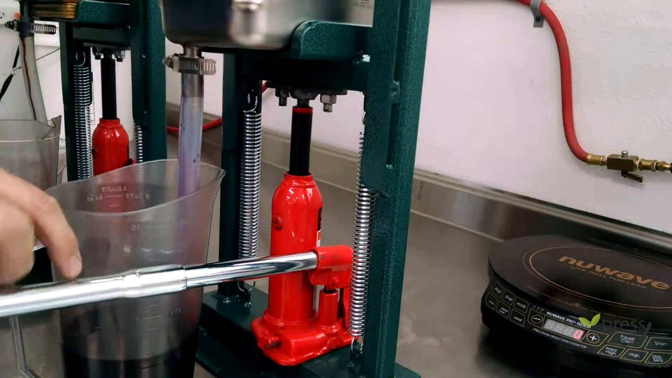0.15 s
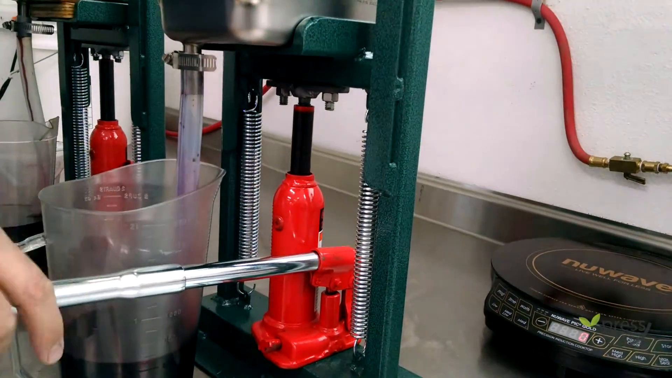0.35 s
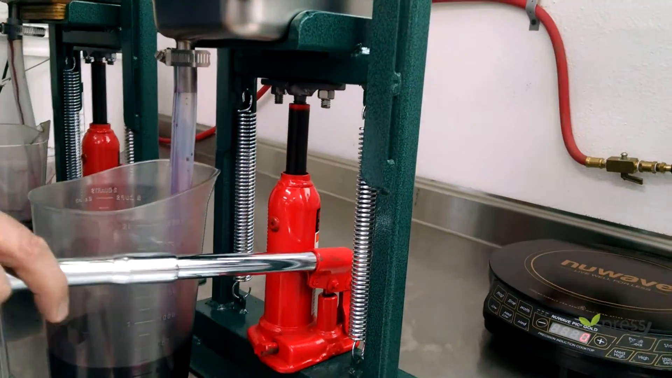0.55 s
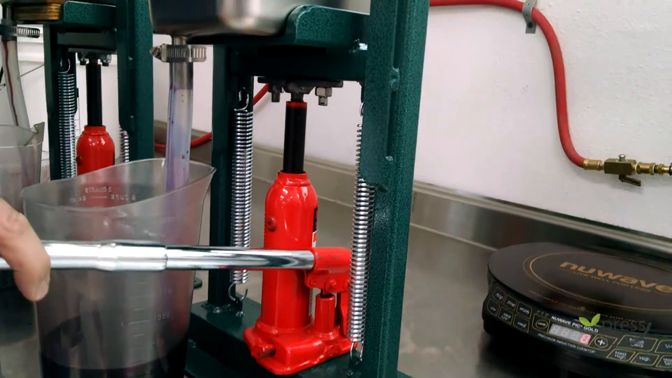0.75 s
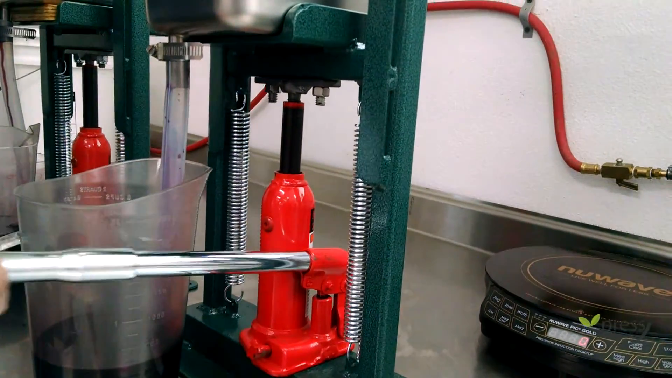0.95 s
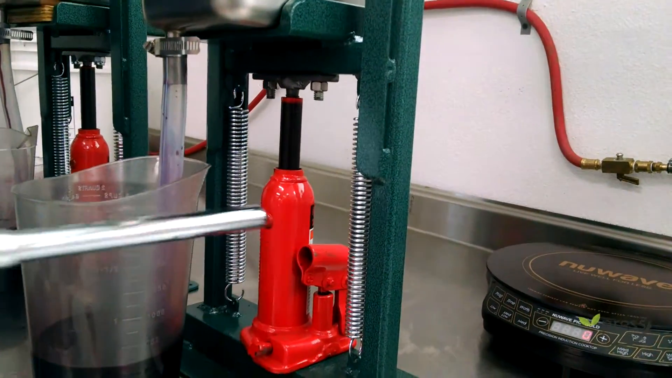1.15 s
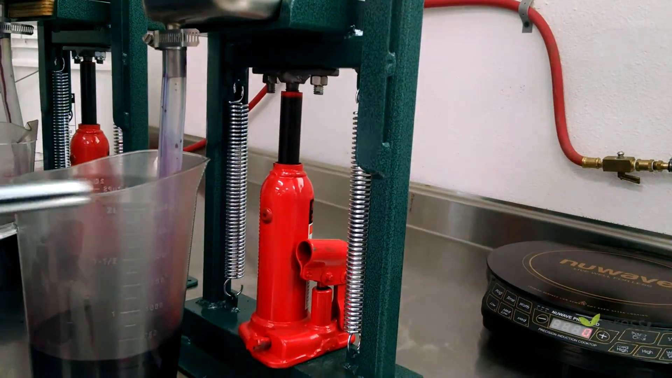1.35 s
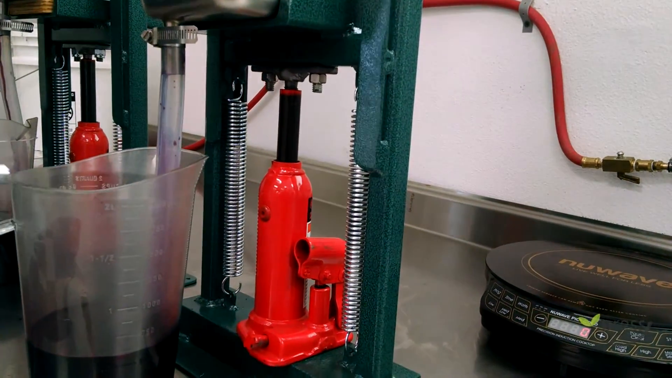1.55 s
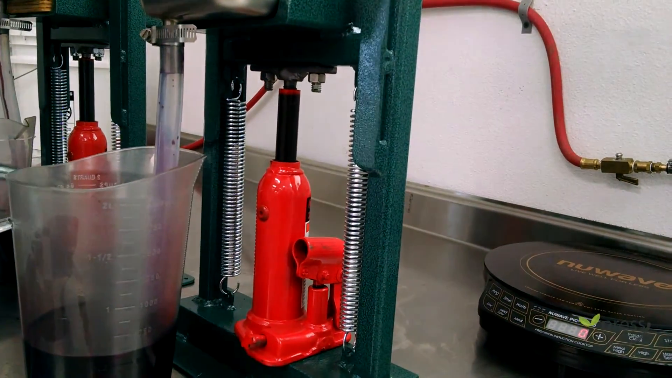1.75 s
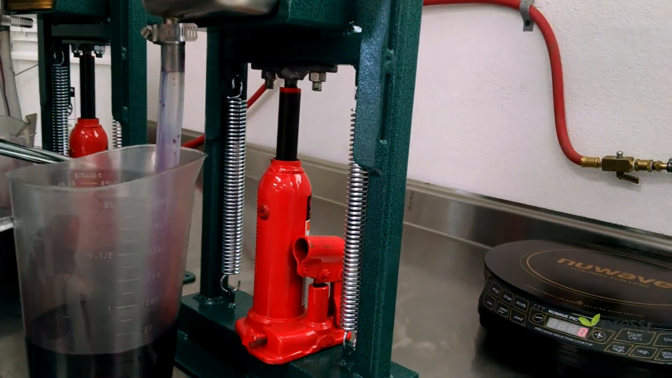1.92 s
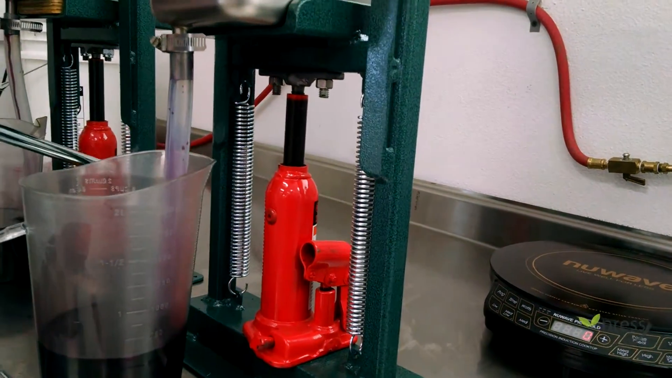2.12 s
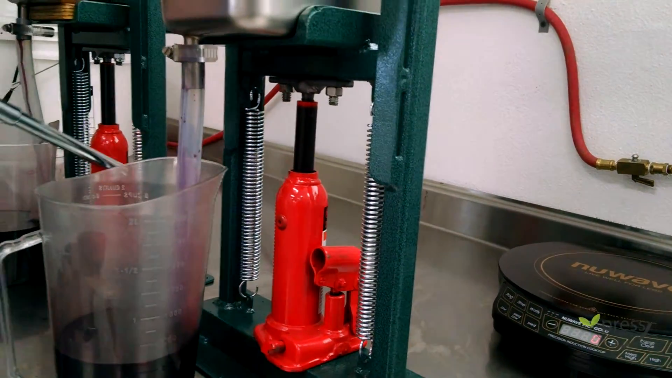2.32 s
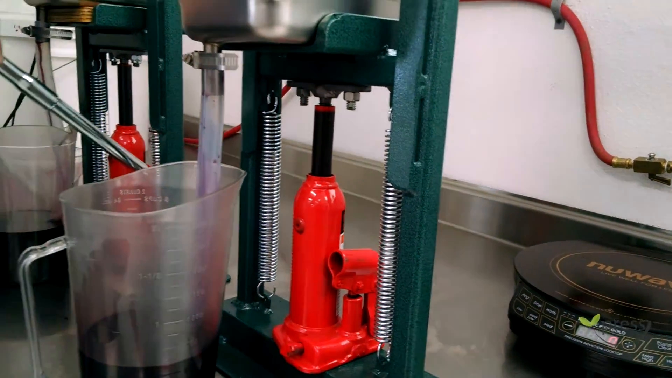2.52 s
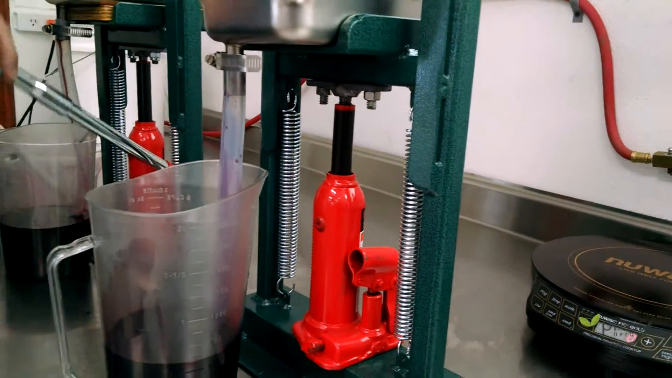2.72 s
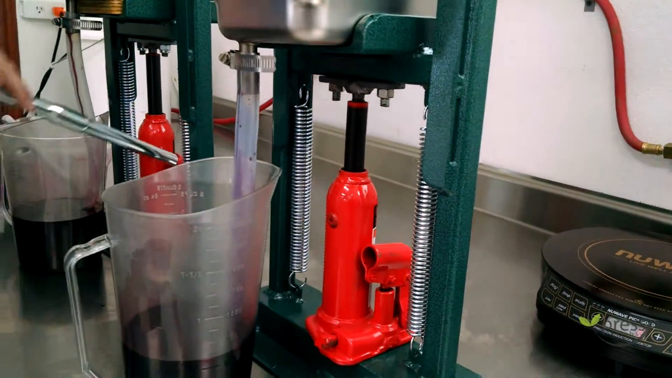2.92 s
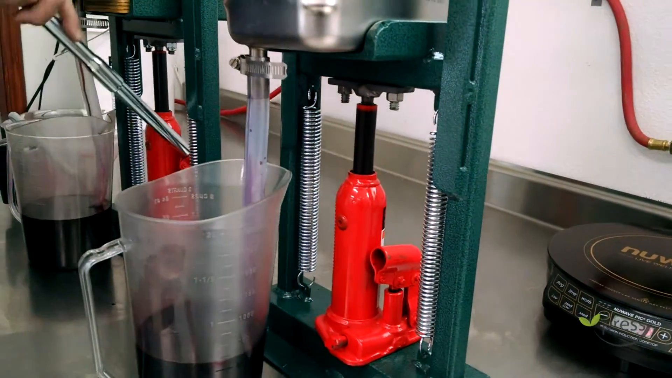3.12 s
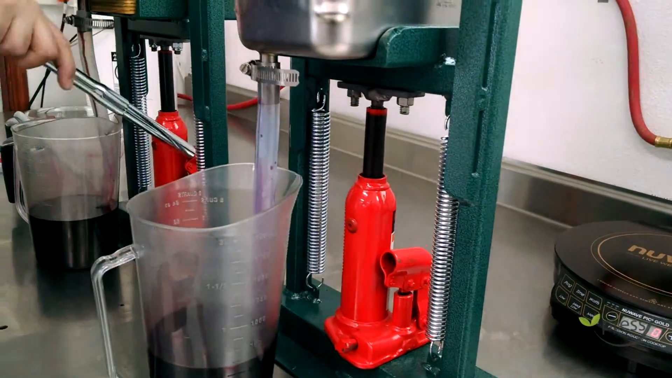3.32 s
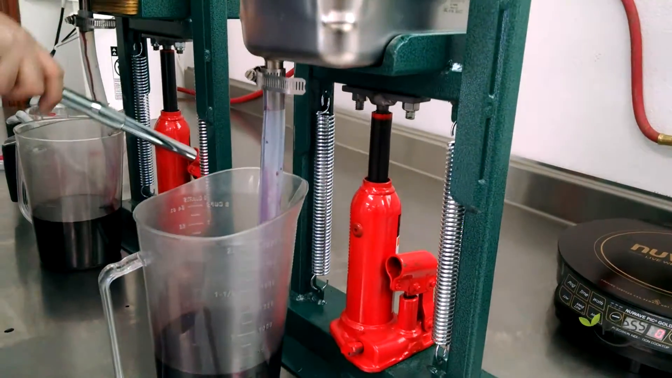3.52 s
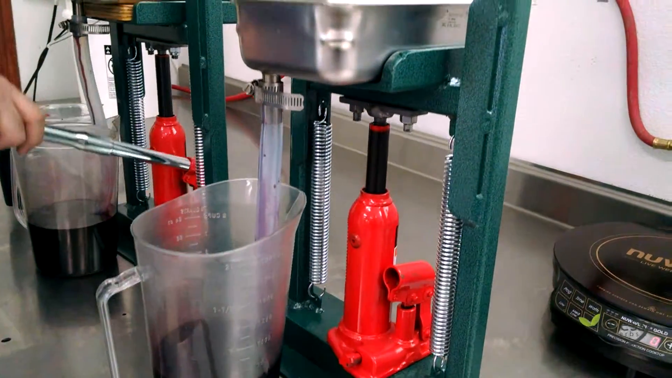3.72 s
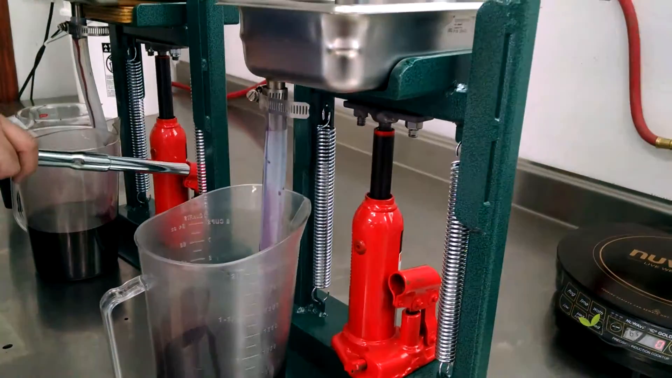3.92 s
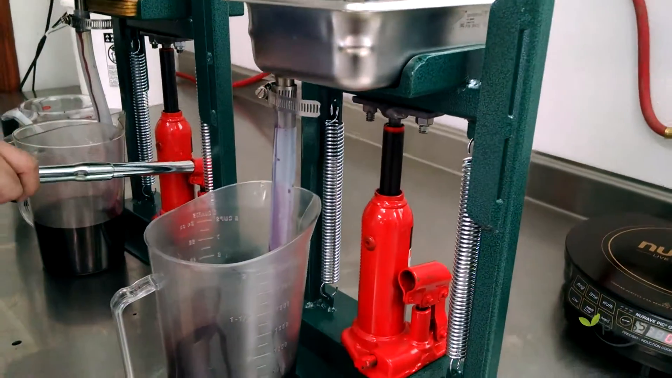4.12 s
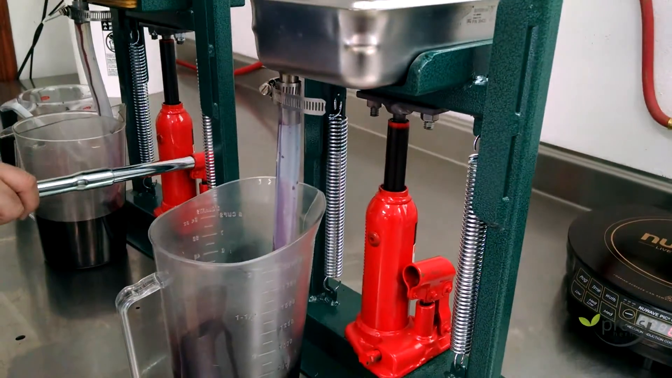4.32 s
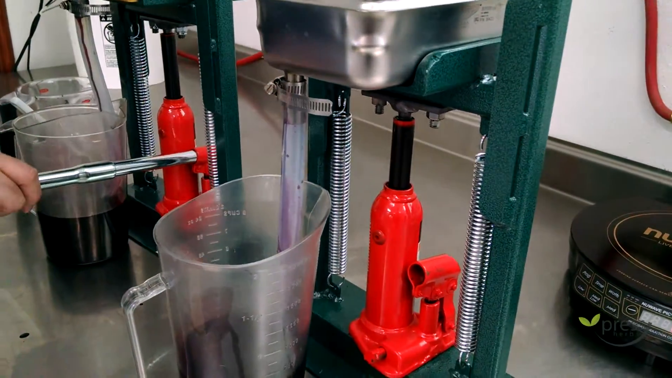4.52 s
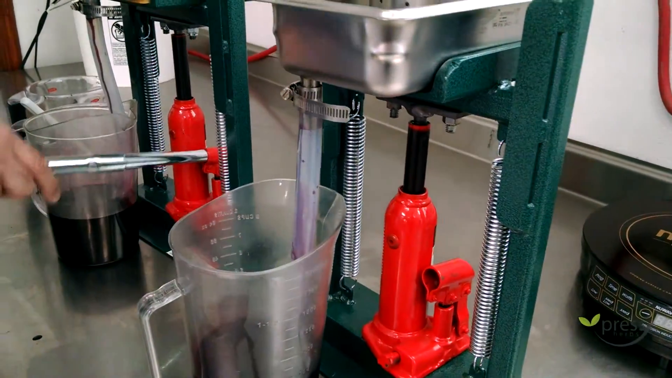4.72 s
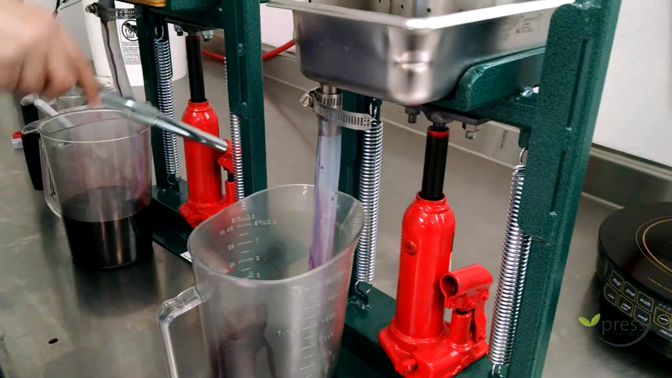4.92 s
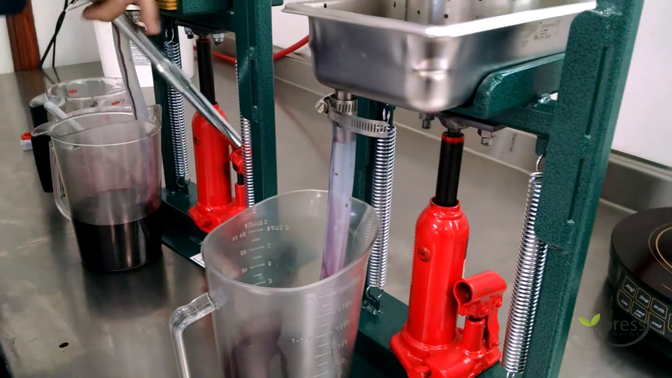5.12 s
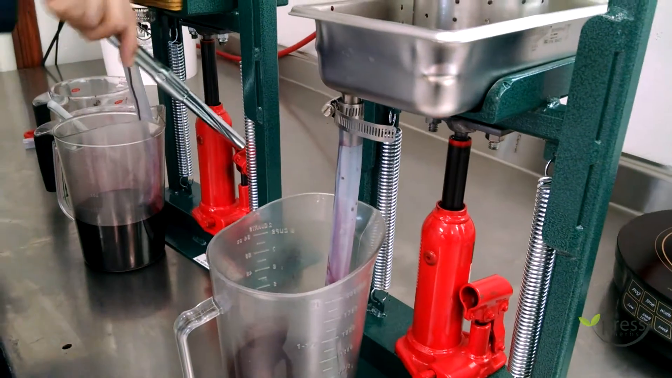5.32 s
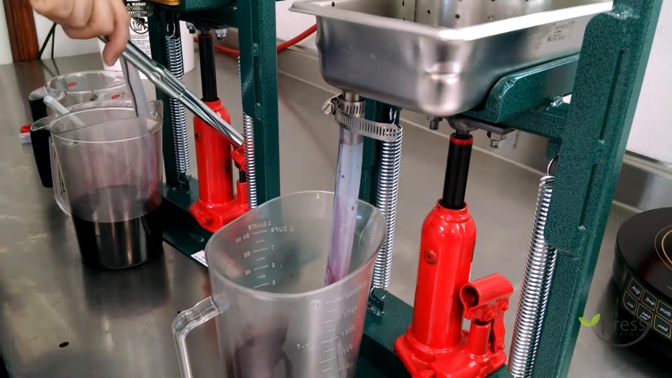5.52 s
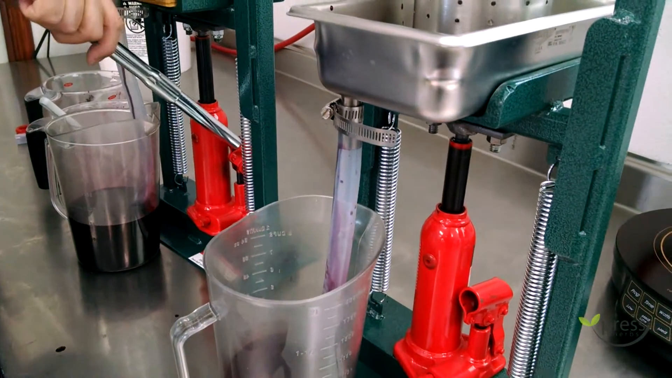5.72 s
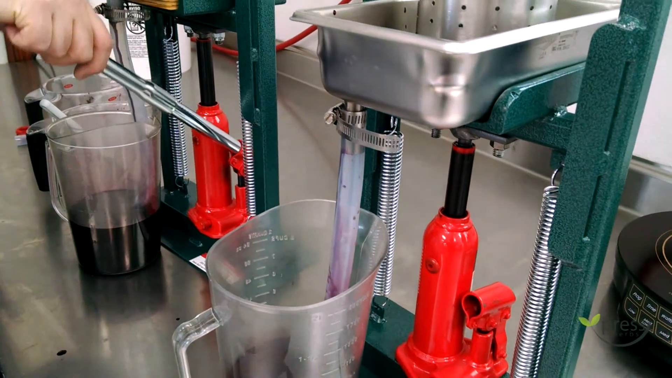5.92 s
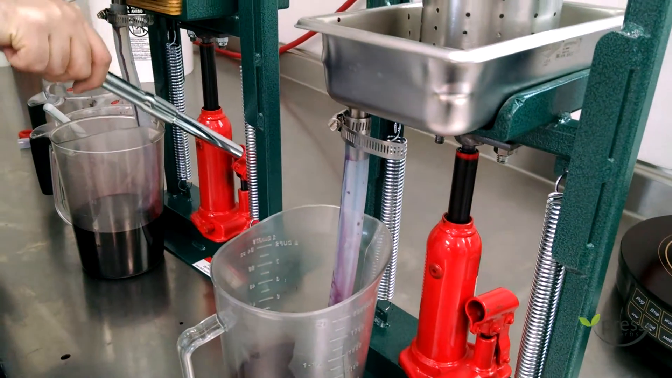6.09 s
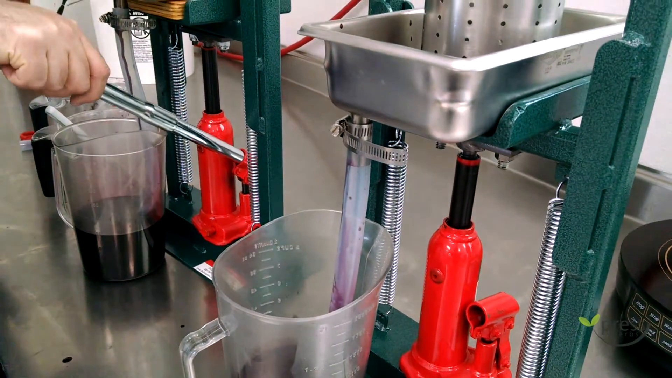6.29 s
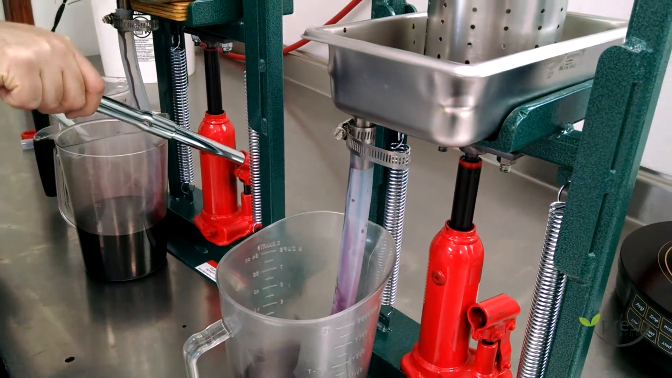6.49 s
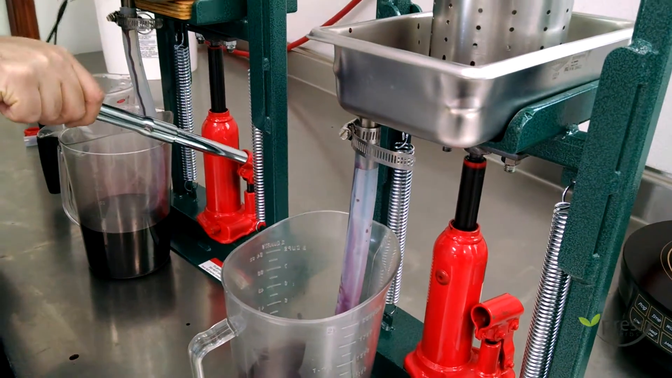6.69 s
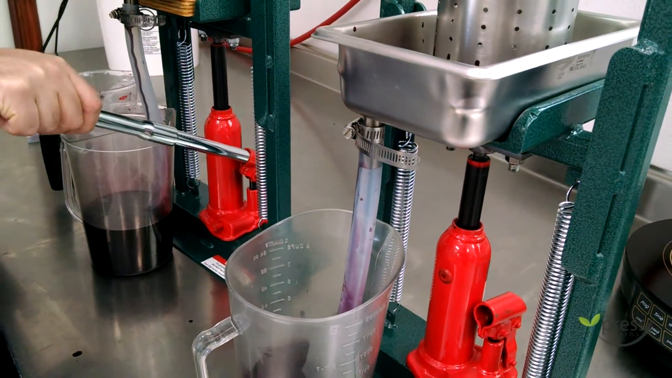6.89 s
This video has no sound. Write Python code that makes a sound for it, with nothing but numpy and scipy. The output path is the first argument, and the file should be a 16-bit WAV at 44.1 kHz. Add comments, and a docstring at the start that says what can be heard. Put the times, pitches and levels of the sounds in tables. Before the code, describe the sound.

A low ventilation drone and a faint fan rush run throughout, in a hard-walled workroom with a short echo. Close to the microphone, a steel handle scuffs softly in the socket of a hydraulic jack, slightly to the left, with a click at about 0.3 seconds and a light clinking near 1.2 seconds. A small knock at 2.3 seconds leads to a very sharp metallic crack at 2.6. Quick clusters of clanks and knocks follow around 3.0 and 3.5 seconds. Faint ticks, thin squeaks and the rubbing of hand and steel continue as the jack is pumped. Just before 5 seconds a loud clank lands with a dull thud through the press frame and a brief rasp. A low, wavering motor hum then comes in, under a softer knock at 5.4 seconds and faint ticks and hissy scrapes until about 7 seconds.

```python
"""A hard-walled workroom, two microphone ports near a pair of bottle jacks.
A steel handle is drawn out of one jack, fitted to the other and pumped. It ticks and scuffs in the
socket and knocks through the press frame; hand and steel rub faintly. Ventilation drones, a fan rushes
and a motor hums late. The ports are cross-subtracted for width, and gain control ducks the room
after loud blows."""
import sys
import numpy as np
from scipy import signal
from scipy.fft import rfft, irfft, next_fast_len
from scipy.io import wavfile
from scipy.ndimage import uniform_filter1d

SR = 44100
rng = np.random.default_rng(int(sys.argv[2]) if len(sys.argv) > 2 else 0)


def bounce(signal):
    """Save signal as a 16-bit WAV file at the path given by the first command-line argument."""
    frames = np.transpose(np.atleast_2d(signal))
    limited = np.clip(frames, -1, 1)
    pcm = np.round(limited * 32767).astype(np.int16)
    wavfile.write(sys.argv[1], SR, pcm)


N = 306487


def amp(db):
    """dB to gain."""
    return 10 ** (np.asarray(db) / 20)


def unit_rms(x):
    """Scales to rms 1."""
    return x / np.sqrt(np.mean(x ** 2) + 1e-20)


def curve_at(points, hz):
    """Reads a spectrum table on a log-frequency axis."""
    freq_hz, value = np.transpose(points)
    return np.interp(np.log(hz + 1), np.log(freq_hz + 1), value)


def fader(points, **ends):
    """Gain over the scene from rows of time_s, level_db."""
    return amp(np.interp(np.arange(N) / SR, *np.transpose(points), **ends))


def add(mix, start_s, sound):
    """Mixes a sound in; a mono sound reaches both ports alike."""
    sound = np.atleast_2d(sound)
    part = mix[:, round(start_s * SR):][:, :sound.shape[1]]
    part += sound[:, :part.shape[1]]


def diffuse_noise(spectrum, patchy_db, size):
    """Noise from all round the room, with drifting patches in its spectrum."""
    # likeness of the two ports in a diffuse field: freq_hz, coherence (0-1)
    likeness = [(30, 0.93), (100, 0.9), (300, 0.84), (800, 0.52), (1300, 0.03), (2000, 0)]
    frames, hz = 4 * N // size + 5, np.fft.rfftfreq(size, 1 / SR)
    a, b, c, d, patches = rng.standard_normal((frames, len(hz), 5)).T
    patches = unit_rms(uniform_filter1d(uniform_filter1d(patches, size=12, axis=0), size=12, axis=1))
    coherence = np.clip(curve_at(likeness, hz), 0, 1)[:, None]
    left = a + 1j * b
    right = coherence * left + np.sqrt(1 - coherence ** 2) * (c + 1j * d)
    spectra = np.array([left, right]) * amp(curve_at(spectrum, hz)[:, None] + patchy_db * patches)
    return unit_rms(signal.istft(spectra, nperseg=size, noverlap=3 * size // 4)[1][:, :N])


def ring(modes, weight_db, detune, t60_share):
    """Sum of dying modes; grip and striking place shift each pitch and phase a little."""
    t = np.arange(SR // 5) / SR
    hz, db, free_t60_s = np.transpose(modes)[:, :, None]
    shift, phase = rng.standard_normal((2, len(modes), 1))
    decay = amp(db + weight_db[:, None] - 60 * t / (free_t60_s * t60_share))
    return (decay * np.sin(2 * np.pi * hz * (1 + detune * shift) * t + 0.35 * phase)).sum(0)


def ventilation():
    """Room tone: the low, steady drone of moving air."""
    # spectrum of the drone: freq_hz, density_db
    spectrum = [(20, 2.5), (50, 2.5), (110, 2.5), (230, 2), (330, -6.5), (500, -7.5), (800, -13),
                (1250, -15.5), (2000, -22.5), (3500, -27.5), (6000, -33), (9000, -38), (13000, -28),
                (16000, -36)]
    return amp(-35) * diffuse_noise(spectrum, patchy_db=1.41, size=2048)


def fan():
    """A hollow band of rushing air near 800 Hz."""
    # spectrum of the rush: freq_hz, density_db
    spectrum = [(450, -20.5), (620, 1), (800, 0.5), (950, -2), (1100, -8.5), (1300, -29)]
    # its level as the microphone turns: time_s, level_db
    levels = [(0.0, -46), (2.4, -44), (3.21, -48), (4.0, -45), (6.1, -44.5), (6.95, -46)]
    return fader(levels) * diffuse_noise(spectrum, patchy_db=1.3, size=2048)


def rubbing():
    """Hand and steel rub: a dull scrape and a fine hiss, both slightly grainy."""
    # strength of the friction: time_s, scrape_db, hiss_db
    levels = [(0.0, -43, -45), (0.25, -59, -49), (0.48, -60, -45.5), (0.9, -64, -64), (1.49, -70, -54),
              (1.97, -65, -47.5), (2.36, -68, -62), (2.65, -59, -48.5), (3.14, -66, -54.5),
              (3.6, -76, -55.5), (3.77, -57, -43.5), (3.95, -54, -50), (4.22, -54, -50.5), (4.41, -55, -40),
              (4.7, -65, -48.5), (5.03, -53, -49), (5.53, -62, -52), (5.75, -80, -87), (6.04, -66, -54.5),
              (6.6, -68, -58), (6.95, -57, -56)]
    # spectrum of the scrape: freq_hz, density_db
    scrape_spectrum = [(1200, -63), (2500, 3.5), (4000, -4), (6000, -2.5), (8000, -18), (11000, -52)]
    # spectrum of the hiss: freq_hz, density_db
    hiss_spectrum = [(5000, -3.5), (8000, 0.5), (10500, 3), (13000, 5.5), (15000, 0.5), (16000, -30)]
    time_s, scrape_db, hiss_db = np.transpose(levels)
    t = np.arange(N) / SR
    grain = amp(0.92 * unit_rms(uniform_filter1d(rng.standard_normal(N), size=300)))
    scrape = amp(np.interp(t, time_s, scrape_db)) * diffuse_noise(scrape_spectrum, 2.5, size=256)
    hiss = amp(np.interp(t, time_s, hiss_db)) * diffuse_noise(hiss_spectrum, 2.1, size=256)
    return grain * (scrape + hiss)


def scuff(level_db, length_s):
    """The handle works in its socket: a soft burst of friction noise, left of centre."""
    # spectrum of a scuff: freq_hz, density_db
    spectrum = [(1100, 3), (2600, -1), (7500, -5), (13000, -4)]
    size, pan_db = round(length_s * SR), 7
    burst = rng.standard_normal((2, size)) * signal.windows.tukey(size, .7)
    burst = irfft(rfft(burst, 4096) * amp(curve_at(spectrum, np.fft.rfftfreq(4096, 1 / SR))))
    return amp(level_db) * burst * amp([[pan_db / 2], [-pan_db / 2]])


def blow(level_db, mid_db, high_db, rattle_t60_s, ring_hz):
    """Steel strikes steel: a sharp crack, a short rattle, and the handle rings, favouring ring_hz."""
    # modes of the steel handle: pitch_hz, level_db, free_t60_s
    modes = [(2055, 0.5, 0.063), (3066, 19.5, 0.018), (3390, -2.5, 0.018), (3716, 1, 0.048),
             (3970, -4, 0.038), (4020, 7, 0.037), (4430, -11, 0.03), (5470, 9, 0.024), (6730, -0.5, 0.015),
             (6370, 7.5, 0.023), (7100, 5, 0.17), (8250, -11, 0.018), (10000, -17, .04), (11300, 17, .03),
             (12100, -13, 0.019), (12200, 12, 0.049), (11360, 15, 0.01), (13140, 2, 0.022),
             (14700, -2, .04), (14000, 3, 0.021)]
    # low, middle and high bands of the crack: centre_hz
    bands = [3100, 5900, 12600]
    t = np.arange(4096) / SR
    envelope = amp(-60 * t / rattle_t60_s) + 2 * amp(-60 * t / 0.0066)
    envelope *= np.minimum(t / 0.00095, 1)
    contact = rng.standard_normal(4096) * envelope
    contact *= np.linalg.norm(envelope) / np.linalg.norm(contact)
    low, mid, high = zip(bands, (0, mid_db, high_db))
    # the crack is weak in the bass and hollow near 9 kHz
    colour = [(600, -24), (1500, -8), low, mid, (8800, (mid_db + high_db) / 2 - 5), high]
    crack = irfft(rfft(contact, 8192) * amp(curve_at(colour, np.fft.rfftfreq(8192, 1 / SR))))
    octaves_away = abs(np.log2(np.transpose(modes)[0] / ring_hz))
    sound = amp(-15.5) * ring(modes, -np.minimum(40 * octaves_away, 14), detune=0.0047, t60_share=0.67)
    sound[:4096] += crack[:4096]
    return amp(level_db) * sound


def squeak(length_s, pitch_hz, width_hz, level_db):
    """Stick-slip noise drives one resonance: a squeak when narrow, a rasp when wide."""
    size, radius = round(length_s * SR), np.exp(-np.pi * width_hz / SR)
    resonator = [1, -2 * radius * np.cos(2 * np.pi * pitch_hz / SR), radius ** 2]
    tone = unit_rms(signal.lfilter([1], resonator, rng.standard_normal((2, size))))
    return amp(level_db) * tone * signal.windows.tukey(size, .4)


def knock(level_db, centre_hz, falloff_db, rise_s):
    """A dull knock through the loaded frame; modes near centre_hz are struck hardest."""
    # modes of the press frame: pitch_hz, level_db, free_t60_s
    modes = [(75, 4, 0.16), (98, 2, 0.17), (173, 2, 0.11), (262, 12, 0.071), (371, 6, 0.072),
             (441, -12, 0.37), (483, 8.5, 0.058), (574, 7, 0.076), (705, 13.5, 0.02), (840, -19, 0.069),
             (912, -5, 0.22), (1070, 2, 0.082), (1296, 2, 0.04), (1467, 3.5, 0.053)]
    octaves_away = np.log2(np.transpose(modes)[0] / centre_hz)
    sound = ring(modes, -falloff_db * octaves_away ** 2, detune=0.007, t60_share=0.91)
    attack = np.minimum(np.arange(len(sound)) / (rise_s * SR), 1)
    return amp(level_db) * attack * sound


def room(x, wet_db, early_db):
    """Each port gets its own close echoes off bench and frame, then a sparse tail dying band by band."""
    # reverberation of the workroom: freq_hz, t60_s
    decay_times = [(250, 0.63), (1000, 0.38), (4000, 0.21), (12000, 0.22)]
    taps = np.zeros((2, SR // 2))
    arrivals = np.arange(300, SR // 2 - 20, 20) + rng.integers(0, 20, (2, (SR // 2 - 301) // 20))
    np.put_along_axis(taps, arrivals, rng.choice([-1., 1.], arrivals.shape), 1)
    hz, t, spectra = signal.stft(taps, SR, nperseg=256)
    decay = amp(-60 * t / curve_at(decay_times, hz)[:, None])
    response = signal.istft(spectra * decay, SR, nperseg=256)[1]
    response *= amp(wet_db) / np.linalg.norm(response[0])
    early_arrivals = rng.integers(8, 290, (2, 12))
    np.put_along_axis(response, early_arrivals, amp(early_db) * rng.choice([-1., 1.], (2, 12)), 1)
    response[0, 6], response[1, 0] = 1, 1  # the direct sound reaches the right port first
    return signal.fftconvolve(x, response, axes=1)[:, :N]


def handle():
    """The handle at work: blows and knocks fill the room; faint scuffs and squeaks stay dry."""
    # scuffs in the socket: start_s, level_db, length_s
    scuffs = [(0.0227, -31.5, 0.052), (0.2394, -31, 0.027), (0.429, -41, 0.022), (0.609, -39.5, 0.025),
              (0.744, -39.5, 0.027), (0.85, -37, 0.028), (0.954, -40, 0.029), (1.06, -40, 0.036),
              (1.313, -41.5, 0.031)]
    # ticks and clanks: start_s, level_db, mid_db, high_db (both over the low band), rattle_t60_s, ring_hz
    blows = [(0.2365, -28, -10, 0, 0.034, 14000), (0.2634, -21, -4, -17, 0.039, 3530),
             (0.7382, -33, -10, -16, 0.027, 3660), (1.1422, -26, -13, -11, 0.03, 3530),
             (1.1558, -26.5, -9, -6, 0.047, 3500), (1.1836, -34.5, -12, -1, 0.03, 3210),
             (2.3259, -25.5, -3, -8, 0.04, 3700), (2.331, -26, -2, 7, 0.05, 12100),
             (2.3835, -39, 5, -1, 0.027, 12100), (2.5841, -6, 4.5, -4.5, 0.012, 6460),
             (2.5859, -17, -6, 9.5, 0.022, 13800), (2.964, -35, 1, -2, 0.035, 3400),
             (2.9963, -24, -2.5, -5, 0.071, 5640), (3.1072, -24, 2, -13, 0.03, 11800),
             (3.1265, -28.5, -19, -7, 0.026, 6600), (3.138, -15, -4, -4, 0.017, 6100),
             (3.421, -34, 3.5, -14, 0.043, 6800), (3.442, -26.5, 5, -13, 0.022, 11900),
             (3.461, -19.5, -1, -1, 0.021, 11700), (3.4744, -14.5, 2, -1, 0.016, 3900),
             (3.7522, -41, 3, 5, 0.03, 11700), (4.132, -36.5, 3.5, -13, 0.03, 3360),
             (4.289, -41, 3, -8, 0.03, 8760), (4.443, -39.5, 9, -8, 0.042, 11700),
             (4.9079, -20, 0.5, -16, 0.029, 3800), (4.936, -23.5, -9, -8, 0.03, 4340),
             (4.9696, -11, -7, -9.5, 0.058, 4030), (5.5454, -39, 0, -8, 0.03, 3630),
             (6.2398, -37, 0, -11, 0.03, 3610), (6.8044, -44, -7, 8, 0.03, 14100)]
    # steel sliding on steel: start_s, length_s, pitch_hz, width_hz, level_db
    squeaks = [(0.238, 0.094, 1900, 1500, -47), (1.142, 0.058, 2720, 1200, -43),
               (3.393, 0.094, 11700, 120, -53.5), (3.95, 0.19, 6100, 600, -50.5),
               (4.976, 0.11, 3700, 1500, -39), (5.379, 0.084, 5560, 4000, -49.5),
               (5.38, 0.1, 11500, 4000, -46.5), (6.053, .11, 12500, 4500, -46.5),
               (6.297, .1, 12000, 4000, -48)]
    # knocks through the frame: start_s, level_db, centre_hz, falloff_db (one octave away), rise_s
    knocks = [(0.244, -34.5, 650, 10, 0.0037), (1.153, -32, 850, 40, 0.0024), (1.371, -40, 756, 27, 0.002),
              (2.2, -44, 850, 16, 0.003), (2.328, -27.5, 930, 3, 0.0097), (3.004, -26, 575, 9, 0.0073),
              (3.012, -30, 1070, 25, 0.0047), (3.46, -37, 300, 1, 0.0088), (3.476, -29.5, 500, 20, 0.0047),
              (3.477, -33, 1050, 30, 0.0026), (4.441, -31.5, 350, 3, 0.001), (4.972, -16, 265, 15, 0.0058),
              (4.989, -29, 380, 5, 0.0025), (5.018, -33, 200, 1, 0.0031), (5.364, -35.5, 479, 3.5, 0.005)]
    ticks, thuds, faint = np.zeros((3, 2, N))
    for start_s, *settings in scuffs:
        add(faint, start_s, scuff(*settings))
    for start_s, *settings in blows:
        add(ticks, start_s, blow(*settings))
    for start_s, *settings in squeaks:
        add(faint, start_s, squeak(*settings))
    for start_s, *settings in knocks:
        add(thuds, start_s, knock(*settings))
    return room(ticks, wet_db=-4, early_db=-14) + room(thuds, wet_db=-9, early_db=-21) + faint


def motor():
    """A motor's wavering hum: one pitch with a narrow band of noise around it."""
    # swells of the hum: time_s, level_db
    levels = [(4.8, -53), (5.05, -34.5), (5.35, -48), (5.55, -39), (6.03, -39.5), (6.25, -42),
              (6.72, -35.5), (6.95, -37)]
    pitch_hz, width_hz = 101.6, 15
    t, pole = np.arange(N) / SR, np.exp(-np.pi * width_hz / SR)
    waver = signal.lfilter([1], [1, -pole], rng.standard_normal(N) + 1j * rng.standard_normal(N))
    envelope = 2.6 + unit_rms(waver.real) + 1j * unit_rms(waver.imag)
    tone = (envelope * np.exp(2j * np.pi * pitch_hz * t)).real
    return fader(levels, left=-90) * unit_rms(tone)


def scene():
    """Pressure at the two microphone ports."""
    return ventilation() + fan() + rubbing() + handle() + motor()


def record(dry):
    # response of the duller left port: freq_hz, gain_db
    left_colour = [(100, -2.5), (3000, -0.5), (8000, -2), (11000, -1), (15000, -16)]
    # part of the other port taken away: freq_hz, share (0-1)
    cross_share = [(50, 0.53), (1000, 0.39), (3000, 0.91), (7500, 0.32), (11000, 0.45), (15000, 1)]
    leak_hz, cross_delay_s, cutoff_hz = 31, .000391, 15550
    threshold_db, recovery_db_per_s, smoothing_s = -18.5, 18.6, 0.019
    size = next_fast_len(N + 4096)
    hz = np.fft.rfftfreq(size, 1 / SR)
    left, right = rfft(dry, size)
    left = left * amp(curve_at(left_colour, hz)) * hz / (hz - 1j * leak_hz)  # its vent leaks bass
    cross = np.clip(curve_at(cross_share, hz), 0, 1) * np.exp(-2j * np.pi * hz * cross_delay_s)
    wide = irfft(np.array([left - cross * right, right - cross * left]), size)[:, :N]
    level_db = 10 * np.log10(abs(uniform_filter1d((wide ** 2).mean(0), size=64)) + 1e-12)
    fall_db = np.arange(N) * recovery_db_per_s / SR
    held_db = np.maximum.accumulate(level_db + fall_db) - fall_db
    over_db = np.maximum(held_db - threshold_db, 0)
    pole = np.exp(-1 / (smoothing_s * SR))
    ducked = wide / amp(0.96 * signal.lfilter([1 - pole], [1, -pole], over_db))
    lowpass = signal.firwin(1023, cutoff_hz, window=("kaiser", 9), fs=SR)
    return signal.oaconvolve(np.clip(ducked, -1, 1), lowpass[None], "same")


dry = scene()
out = record(dry)
bounce(out)
```